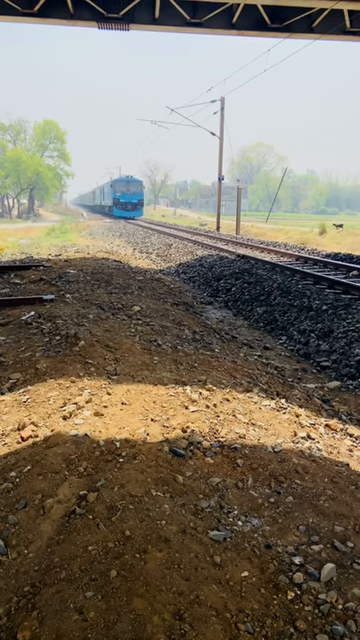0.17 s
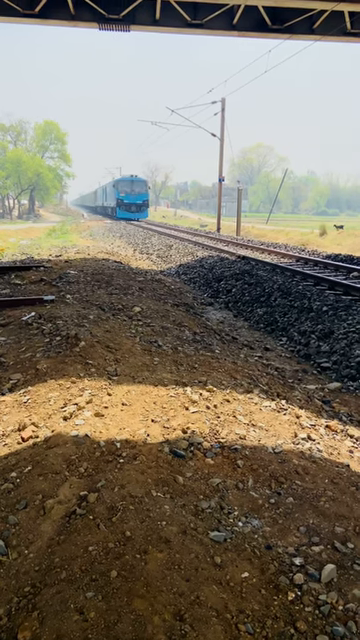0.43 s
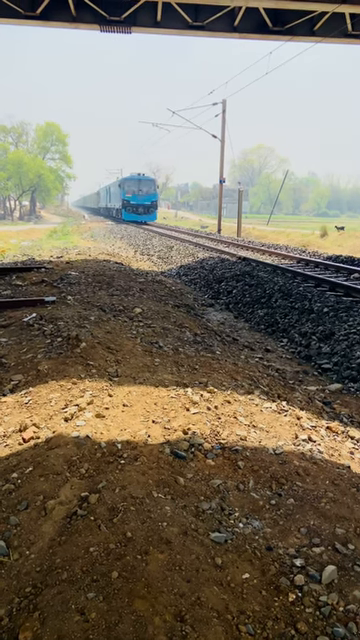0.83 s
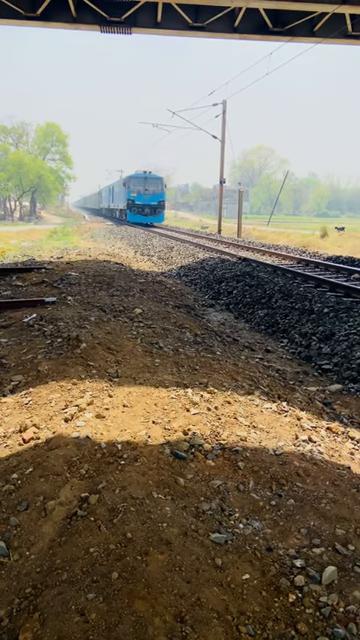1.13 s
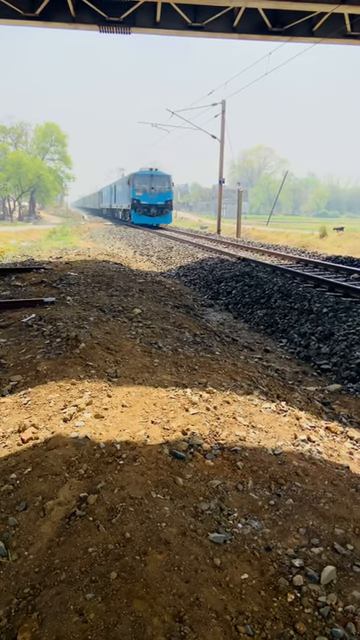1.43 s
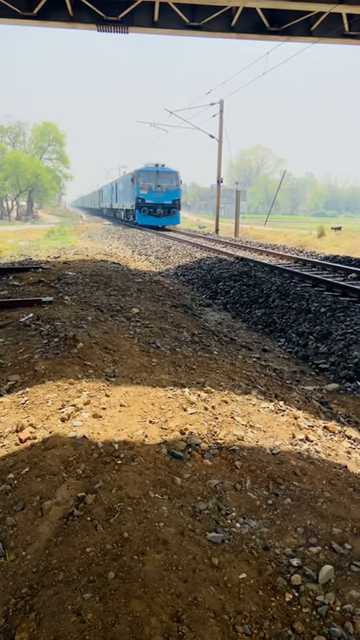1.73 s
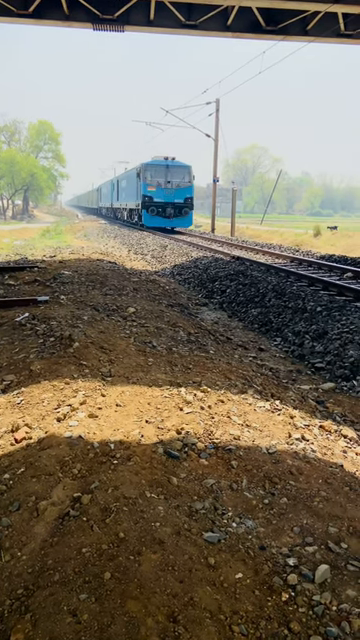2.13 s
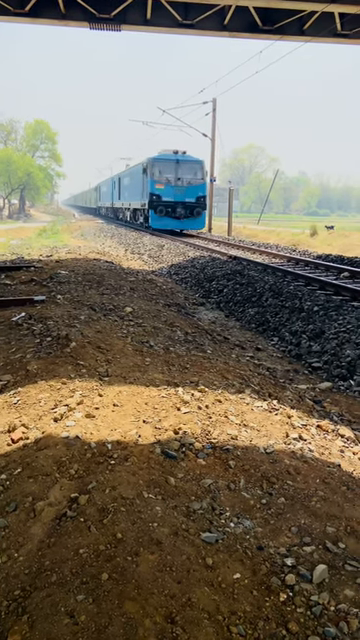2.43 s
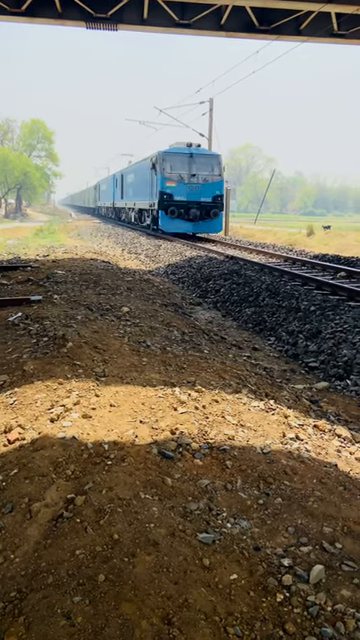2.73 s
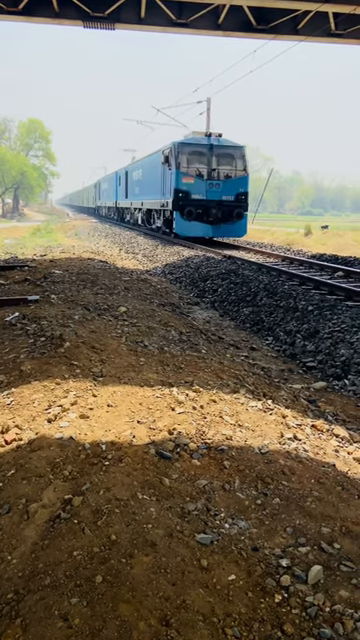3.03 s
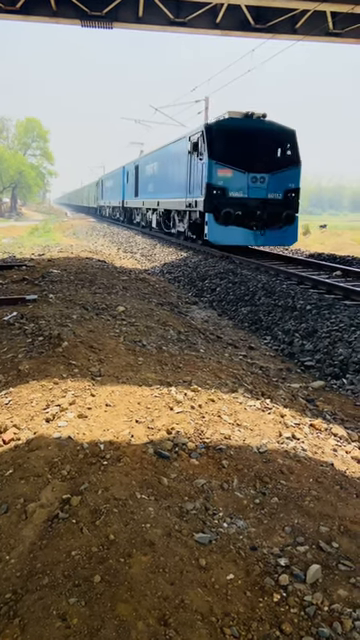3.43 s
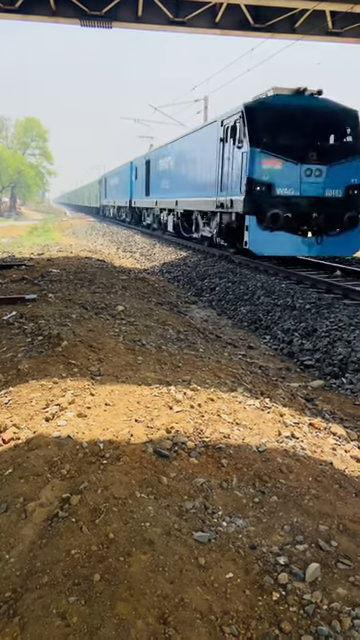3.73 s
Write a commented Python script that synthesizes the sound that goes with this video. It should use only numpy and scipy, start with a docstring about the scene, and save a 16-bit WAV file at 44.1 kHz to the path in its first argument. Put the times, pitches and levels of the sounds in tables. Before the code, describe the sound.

An electric freight train approaches from far off, heard trackside under a steel bridge. A quiet low rumble, hum and airy wheel roar swell throughout, with fluttering mid-pitched motor and gear whines growing stronger after 2 s. Faint metallic ticks sound around 0.6-0.9, 1.5-1.7 and 2.2-2.5 s. At about 3.7 s, axles clank sharply over a joint, followed by heavy thuds and short fluttering echoes; the roar is still loud at the 3.9 s cut.

```python
"""An electric goods train draws near over open fields, heard from under a steel bridge.
Rolling roar and ground rumble, both shaped noise, swell as it closes in; rings are resonated noise.
Motors and gears whine as wavering sines over a low hum. Axles clank over a rail joint: decaying steel
modes with noise crashes, then low thuds. Two close microphone ports pick it up with the bridge's echoes."""
import sys
import numpy as np
from scipy import signal
from scipy.fft import rfft, irfft, next_fast_len
from scipy.io import wavfile
from scipy.ndimage import uniform_filter1d

SR = 44100
rng = np.random.default_rng(int(sys.argv[2]) if len(sys.argv) > 2 else 0)


def linear_from_db(decibels):
    """Turn decibels (scalar or array-like) into linear amplitude factors; 0 gives 1."""
    return 10 ** (np.asarray(decibels, float) / 20)


def unload_audio(sound):
    """Save the sound as a 16-bit wav file, at the path given as the first command line argument."""
    columns = np.transpose(np.atleast_2d(sound))
    # keep every value between -1 and 1, then stretch to whole-number steps
    steps = np.round(np.clip(columns, -1, 1) * 32767)
    wavfile.write(sys.argv[1], SR, steps.astype(np.int16))


N = 171549


def evened(x):
    """Scale to rms 1."""
    return x / np.sqrt(np.mean(x ** 2) + 1e-20)


def read(points, hz):
    """Interpolate a table over log frequency."""
    f, value = np.transpose(points)
    return np.interp(np.log(hz + 1), np.log(f + 1), value)


def add(mix, start_s, sound):
    """Add a sound in place, cut at the end of the mix."""
    part = mix[round(start_s * SR):][:len(sound)]
    part += sound[:len(part)]


def slow(highest_hz, lowest_hz=1.214):
    """Random motion of rms 1: 24 sines between two rates, weaker toward the fast end."""
    t = np.arange(0, N + 64, 64) / SR
    f, phase = np.geomspace(lowest_hz, highest_hz, 24), rng.random(24)
    sines = np.sin(2 * np.pi * (f[:, None] * t + phase[:, None]))
    wave = (sines / np.sqrt(f[:, None])).sum(0)
    return np.interp(np.arange(N) / SR, t, evened(wave))


def swell(follow):
    """Gain of a layer that follows the approach by its own share of the dB change."""
    # loudness of the approaching train: (time [s], level [dB])
    nearness = [(0.0, -39.5), (0.71, -34), (2.07, -30), (3.08, -27), (3.22, -26.5), (3.23, -26),
                (3.52, -24), (3.66, -23.5), (3.7, -22), (3.73, -19.5), (3.77, -20), (3.89, -21)]
    reference_db = -32  # gain 1 at this nearness
    s, db = np.transpose(nearness)
    return linear_from_db(follow * (np.interp(np.arange(N) / SR, s, db) - reference_db))


def resonate(x, hz, width_hz):
    """A resonance of gain 1: shift down, smooth, shift back."""
    turn = np.exp(2j * np.pi * hz * np.arange(len(x)) / SR)
    r = np.exp(-np.pi * width_hz / SR)
    return 2 * (turn * signal.lfilter([1 - r], [1, -r], x / turn)).real


def resonate_twice(x, hz, width_hz):
    """Two equal resonances in series, for steeper skirts; rms 1."""
    return evened(resonate(resonate(x, hz, width_hz), hz, width_hz))


def noise(spectrum, patchy_db, size):
    """Noise of rms 1 and the given colour, with level patches drifting over time and frequency."""
    frames, hz = 4 * N // size + 5, np.fft.rfftfreq(size, 1 / SR)
    a, b, patches = rng.standard_normal((frames, len(hz), 3)).T
    patches = evened(uniform_filter1d(uniform_filter1d(patches, 10, 0), 10, 1))
    outside_db = -100 * (hz > spectrum[-1][0])
    colour_db = (read(spectrum, hz) + outside_db)[:, None]
    z = (a + 1j * b) * linear_from_db(colour_db + patchy_db * patches)
    return evened(signal.istft(z, nperseg=size, noverlap=3 * size // 4)[1][:N])


def line(hz, drift_hz_per_s, wander_hz):
    """A sine of rms 1 whose pitch drifts and wanders."""
    pitch_hz = hz + drift_hz_per_s * np.arange(N) / SR + wander_hz * slow(9.1)
    return np.sqrt(2) * np.sin(2 * np.pi * np.cumsum(pitch_hz) / SR)


def loaded(load, hz, drift_hz_per_s, wander_hz):
    """A whine that follows its load and flutters quickly."""
    flutter_db = 2  # rms
    db = np.interp(np.arange(N) / SR, *np.transpose(load))
    return linear_from_db(db + flutter_db * slow(40., lowest_hz=7.)) * line(hz, drift_hz_per_s, wander_hz)


def ground_rumble():
    """Ground and wagon bodies shake as low noise, swelling less than the roar."""
    # ground and wagon bodies: (frequency [Hz], relative density [dB per Hz])
    body_spectrum = [(20, -31), (30, -22), (40, -4.5), (52, 2), (75, 3.5), (123, -9.5), (157, -3),
                     (210, -15), (320, -15.5), (500, -22.5), (1000, -82.5)]
    return linear_from_db(-31.5) * swell(0.78) * noise(body_spectrum, patchy_db=0.45, size=2048)


def rolling_roar():
    """Wheel on rail: broadband noise with a small quick waver in level."""
    # wheel on rail: (frequency [Hz], relative density [dB per Hz])
    rail_spectrum = [(41, -63), (121, -17.5), (251, 1.5), (451, -4), (701, -7.5), (1201, -7), (1601, -14),
                     (2301, -12), (3301, -20), (4301, -26), (5401, -28), (6201, -31), (6901, -31),
                     (8001, -39), (12001, -40.5), (13601, -44), (14401, -69)]
    level_db = -34 + 0.51 * slow(13.0)  # at reference nearness
    return swell(1) * linear_from_db(level_db) * noise(rail_spectrum, patchy_db=1.0, size=1024)


def wheel_rings():
    """The rough rail excites wheel and rail resonances: noise through narrow bands."""
    # wheels and rail: (frequency [Hz], nominal width [Hz], level at reference nearness [dB])
    resonances = [(157.1, 14.4, -43), (196.7, 32.6, -41.5), (397.3, 26, -45), (597.3, 17, -45),
                  (653, 13, -47), (690, 23, -46), (1010, 39, -41.5), (1755, 103, -47), (2014, 67, -48.5),
                  (2326, 60, -54.5), (2550, 25, -56.5), (2903, 170, -57), (3393, 110, -57),
                  (5300, 190, -65)]
    out = np.zeros(N)
    for hz, width_hz, db in resonances:
        # each stage wider, as two in series narrow the band
        out += linear_from_db(db) * resonate_twice(rng.standard_normal(N), hz, 1.3 * width_hz)
    return swell(1) * out


def hum():
    """Low motor hum that hardly follows the approach."""
    level_db = -35 + 1.4 * slow(35.0)  # at reference nearness
    return linear_from_db(level_db) * swell(0.13) * line(51.43, drift_hz_per_s=0.8, wander_hz=3)


def steady_whines():
    """Motors and gears as near-sine lines that waver and swell with the approach."""
    # clean whines: (pitch [Hz], level at reference nearness [dB], drift [Hz/s],
    # wander [Hz rms], waver [dB rms, sign flips it])
    whines = [(1018, -47.5, 1.8, 3, 1), (692, -61, 0.15, 1.9, -6.5), (5180, -72, 0.12, 5.4, -2)]
    out = np.zeros(N)
    for hz, db, drift_hz_per_s, wander_hz, waver_db in whines:
        out += linear_from_db(db + waver_db * slow(10.0)) * line(hz, drift_hz_per_s, wander_hz)
    return swell(0.93) * out


def drone():
    """Low drone: one sine that fades in and out on the way through the air."""
    # strength of the low drone: (time [s], level [dB])
    drone_load = [(0.0, -52.5), (0.24, -41), (0.51, -56.5), (0.7, -41), (0.78, -65), (0.84, -49),
                  (1.59, -43), (1.69, -62), (1.75, -40), (2.1, -43), (2.13, -49), (2.24, -35), (2.34, -51),
                  (2.39, -39), (2.59, -43), (2.62, -32), (3.24, -36.5), (3.26, -39.5), (3.53, -39.5),
                  (3.57, -31), (3.62, -35.5), (3.89, -32.5)]
    return loaded(drone_load, 332.7, drift_hz_per_s=2.2, wander_hz=1.66)


def blower():
    """Upper whine of the blower, falling slowly in pitch and fading in and out through the air."""
    # strength of the upper whine: (time [s], level [dB])
    blower_load = [(0.0, -67), (0.07, -51), (0.55, -60.5), (0.7, -42), (1.13, -49.5), (1.6, -43.5),
                   (1.62, -63), (1.67, -40), (1.72, -48), (1.96, -42), (2.0, -47), (2.04, -48),
                   (2.4, -35.5), (2.68, -55.5), (2.7, -35), (3.21, -39), (3.23, -25.5), (3.35, -56.5),
                   (3.39, -31.5), (3.46, -56), (3.54, -28), (3.57, -52), (3.65, -28.5), (3.8, -45),
                   (3.86, -27.5), (3.89, -39.5)]
    return loaded(blower_load, 1755, drift_hz_per_s=-1.162, wander_hz=2.5)


def gears():
    """The loudest whine and the highest loaded one, both fading in and out through the air."""
    # strength of the loudest whine: (time [s], level [dB])
    gear_load = [(0.0, -39), (0.13, -48.5), (0.24, -37.5), (0.3, -44), (0.66, -36), (0.69, -43),
                 (1.07, -37), (1.09, -35), (1.21, -38), (1.51, -38), (1.59, -42), (1.77, -35), (1.8, -46),
                 (1.87, -49), (1.92, -45), (1.96, -32), (2.05, -41), (2.08, -26), (2.11, -51),
                 (2.13, -30.5), (2.22, -43), (2.33, -28.5), (2.37, -61), (2.39, -42.5), (2.63, -34.5),
                 (3.03, -28), (3.11, -39), (3.13, -29), (3.2, -56), (3.24, -23), (3.35, -24.5), (3.42, -41),
                 (3.48, -23.5), (3.56, -48), (3.67, -32), (3.69, -39), (3.75, -24), (3.79, -52),
                 (3.87, -23.5), (3.89, -28)]
    # strength of the highest loaded whine: (time [s], level [dB])
    top_load = [(0.0, -70), (0.03, -61), (0.43, -46.5), (0.53, -69), (1.07, -44), (1.18, -66), (1.6, -45),
                (1.79, -65), (1.81, -51), (2.0, -45), (2.21, -56), (2.27, -41), (2.46, -52), (2.59, -36),
                (2.81, -53.5), (3.27, -41), (3.29, -34), (3.36, -49), (3.4, -38), (3.5, -48), (3.52, -40.5),
                (3.77, -43), (3.79, -35), (3.89, -47)]
    loudest = loaded(gear_load, 1001, drift_hz_per_s=2.8, wander_hz=1.5)
    return loudest + loaded(top_load, 2036, drift_hz_per_s=0.262, wander_hz=3.3)


def joint_clanks():
    """Each blow rings the steel modes near its brightest pitch, with a short crash in the same range."""
    # axles over the joint: (time [s], ring level before mode weights [dB],
    # crash level at onset before the rise [dB], crash t60 [s], brightest pitch [Hz])
    clanks = [(.612, -48.5, -58, 0.44, 4960), (.625, -35, -73, .2, 7300), (.635, -49.5, -71, .2, 6100),
              (.71, -53, -74, .2, 7200), (.715, -75, -62, .15, 11700), (0.827, -40, -51, .2, 4230),
              (.852, -56, -73, .2, 9700), (.853, -62, -77, .2, 10770), (.885, -49, -62, .2, 4200),
              (1.475, -42, -53, 0.22, 4320), (1.495, -60, -82, .2, 10770), (1.5, -47, -56, .3, 4930),
              (1.715, -52, -64, .2, 5600), (1.742, -56, -81, .2, 10700), (2.242, -44, -38, 0.37, 3120),
              (2.244, -49, -52, 0.29, 4300), (2.25, -51, -43, 0.29, 5300), (2.472, -65, -47, .2, 4280),
              (3.53, -60, -45.5, .2, 8500), (3.675, -38.5, -43, .2, 9200), (3.689, -69, -43, .1, 12700),
              (3.712, -56, -37.5, 0.089, 9800), (3.712, -68, -43, .06, 14900),
              (3.718, -18.5, -14.5, 0.15, 692), (3.72, -43, -24.5, 0.1, 1290),
              (3.722, -45, -34, 0.16, 2280), (3.734, -43, -42, .15, 9400), (3.738, -38.5, -33, 0.28, 4250),
              (3.748, -36, -34, 0.2, 5040), (3.74, -35, -25, .2, 860), (3.725, -70, -50, .15, 14800),
              (3.754, -29.5, -30.5, 0.34, 8870), (3.753, -38, -34, 0.23, 5950),
              (3.775, -40, -48, .15, 9100), (3.785, -33.5, -52, .2, 5240), (3.79, -40, -29.5, .2, 2000)]
    # modes of the steel: (frequency [Hz], level [dB], t60 [s])
    steel = [(658, 0, .1), (880, -4, .08), (1228, -6, .08), (3070, -2, .2), (4170, -4, .15),
             (4281, -2, .15), (4930, 0, .3), (5180, -3, .15), (5935, -2, .15), (6036, 0, .45),
             (7000, -4, .2), (7330, -2, .2), (9291, 0, .11), (9450, -3, .07), (9751, -4, .15),
             (10771, -2, .3), (12501, -8, .08)]
    rise_s = 0.005  # at reference nearness: far blows arrive smeared, near ones sharp
    reach_octaves = 0.11  # modes this far from the brightest pitch lie 6 dB down
    out, t = np.zeros(N), np.arange(0, .3, 1 / SR)
    sharp = swell(1.3)
    hz, mode_db, t60_s = np.transpose(steel)[:, :, None]
    phases = rng.random((len(clanks), len(steel), 1))
    hiss = rng.standard_normal((len(clanks), len(t)))
    for (s, ring_db, crash_db, crash_t60_s, bright_hz), phase, puff in zip(clanks, phases, hiss):
        share_db = -6 * (np.log2(hz / bright_hz) / reach_octaves) ** 2
        decay = linear_from_db(ring_db + mode_db + share_db - 60 * t / t60_s)
        ring = (decay * np.sin(2 * np.pi * (hz * t + phase))).sum(0)
        rattle = linear_from_db(3 * evened(uniform_filter1d(puff[::-1], size=200)))  # 3 dB rms
        width_hz = min(0.35 * bright_hz, 1800)
        crash = resonate_twice(puff, bright_hz, width_hz) * linear_from_db(crash_db - 60 * t / crash_t60_s)
        rise = 1 - np.exp(-t * sharp[round(s * SR)] / rise_s)
        add(out, s, rise * (rattle * ring + crash))
    return out


def bogie_thuds():
    """The leading bogie shakes the ground: low sines that rise and die quickly."""
    # thuds: (time [s], level before the envelope [dB], pitch [Hz])
    thuds = [(3.735, -20, 105), (3.738, -23, 199.3), (3.76, -29, 391.3), (3.79, -22.5, 212.2),
             (3.808, -34, 161.7), (3.829, -19, 290.3), (3.849, -15, 108)]
    out, t = np.zeros(N), np.arange(0, .3, 1 / SR)
    u = t / 0.073  # s
    envelope = np.e * u * np.exp(-u) * linear_from_db(-3 * u)
    for s, db, hz in thuds:
        add(out, s, linear_from_db(db) * envelope * np.sin(2 * np.pi * hz * t))
    return out


def bridge_tails(t):
    """Three scattered echo tails of the steel bridge; the treble dies sooner."""
    scatter = rng.standard_normal((3, len(t)))
    low = signal.sosfilt(signal.butter(2, 2200, fs=SR, output="sos"), scatter)
    slow_fade, quick_fade = linear_from_db(-60 * t / 0.49), linear_from_db(-60 * t / 0.13)  # t60 in s
    low_tail = low * slow_fade / np.linalg.norm(slow_fade)
    return low_tail + (scatter - low) * quick_fade / np.linalg.norm(quick_fade)


def bridge_ports(train):
    """Left port: direct train. Right port: train turned in phase, mixed with fluttering bridge echoes."""
    # right against left: (frequency [Hz], phase [rad])
    port_phase = [(170, 0), (690, -.2), (1200, .1), (1720, -.2), (2240, -1.1), (3300, -1.6), (3800, -1.5),
                  (4300, -.3), (5340, -.4), (5860, -1.1), (6250, -2), (6700, -3.05), (8100, -3.25),
                  (8400, -4.2), (9470, -5.7), (10500, -6.28), (11500, -6.8), (12200, -8.2), (12550, -9.35),
                  (14000, -9.5), (14600, -11), (15800, -11.5)]
    # likeness of the ports: (frequency [Hz], coherence [0..1])
    port_same = [(40, .999), (170, .99), (310, .99), (530, 0.45), (1200, 0.61), (1720, .7), (2500, 0.51),
                 (3300, 0.87), (4300, .4), (5340, .85), (6250, .7), (6700, .98), (8100, 0.99), (8500, .6),
                 (10500, 0.75), (12200, .7), (12550, .98), (14000, 0.98), (14600, .8)]
    # left minus right: (frequency [Hz], level [dB])
    port_balance = [(60, -.4), (200, -2.1), (500, -2.4), (770, -.3), (1180, -.8), (2750, 1.3), (3300, 2),
                    (4800, -3), (5900, -1.1), (7000, -.1)]
    t = np.arange(0, .4, 1 / SR)
    tails = bridge_tails(t)
    # three echo tails take turns at constant total power, so the bridge echo flutters
    cycles = 4.5 * np.arange(N) / SR + np.arange(3)[:, None] / 3  # 4.5 turns per s
    turns = np.sqrt(2 / 3) * np.cos(np.pi * cycles)
    size = next_fast_len(N + len(t))
    hz, direct = np.fft.rfftfreq(size, 1 / SR), rfft(train, size)
    echo = (rfft(train * turns, size) * rfft(tails, size)).sum(0)
    same = np.clip(read(port_same, hz), 0, 1)
    tilt = linear_from_db(read(port_balance, hz) / 2)  # half to each port
    right = same * np.exp(1j * read(port_phase, hz)) * direct + np.sqrt(1 - same ** 2) * echo
    return irfft(np.array([direct * tilt, right / tilt]), size)[:, :N]


def scene():
    """The whole train, heard at the two ports under the bridge."""
    rolling = ground_rumble() + rolling_roar() + wheel_rings()
    motors = hum() + steady_whines() + drone() + blower() + gears()
    return bridge_ports(rolling + motors + joint_clanks() + bogie_thuds())


def roll_off(x):
    """The treble ends steeply here."""
    return signal.sosfilt(signal.butter(12, 15900, fs=SR, output="sos"), x)


def record(dry):
    """The microphones drop the deepest bass, below 37 Hz."""
    cut = signal.sosfilt(signal.butter(5, 37, "high", fs=SR, output="sos"), dry)
    return roll_off(cut)


dry = scene()
out = record(dry)
unload_audio(out)
```